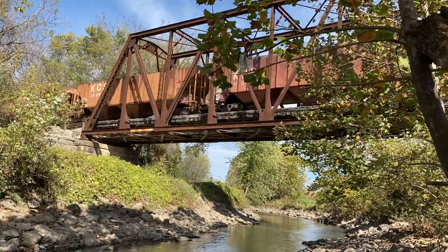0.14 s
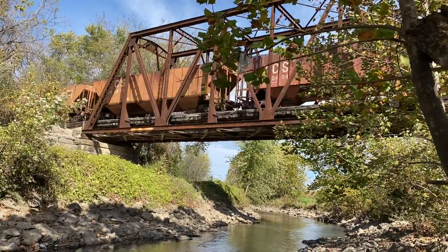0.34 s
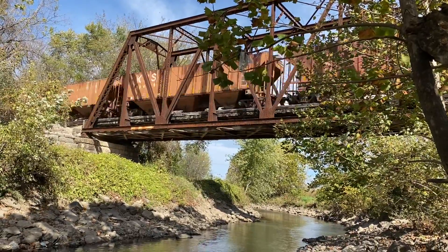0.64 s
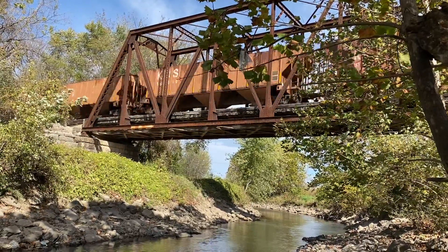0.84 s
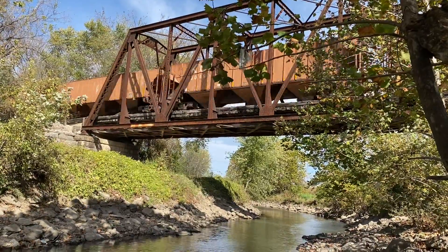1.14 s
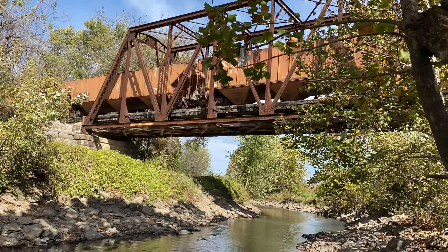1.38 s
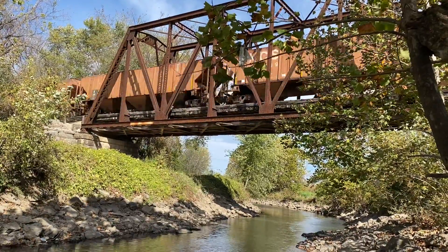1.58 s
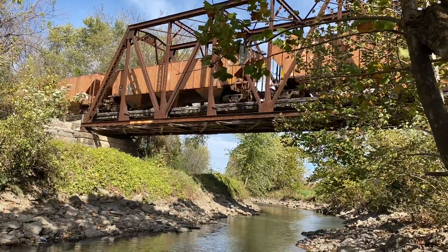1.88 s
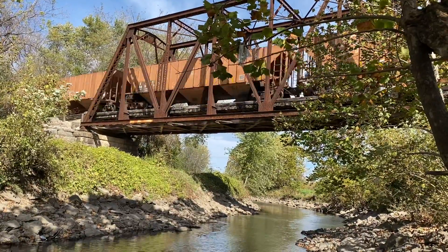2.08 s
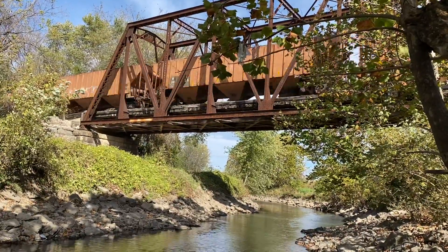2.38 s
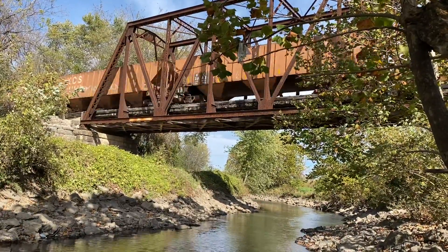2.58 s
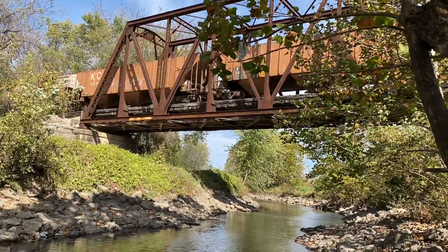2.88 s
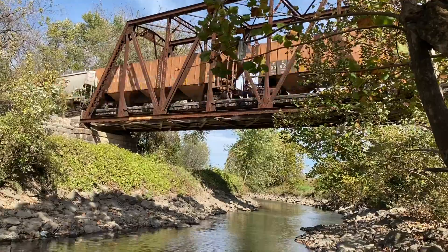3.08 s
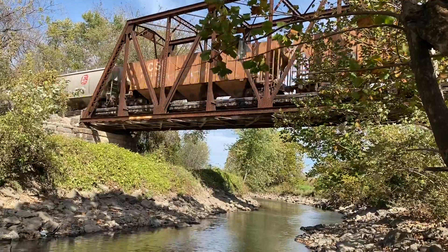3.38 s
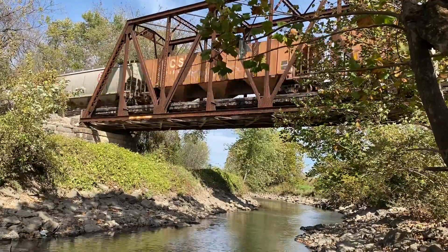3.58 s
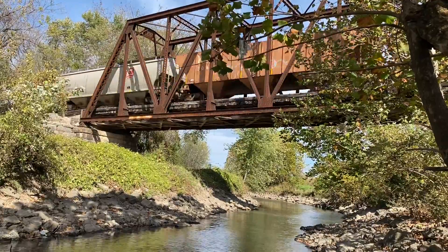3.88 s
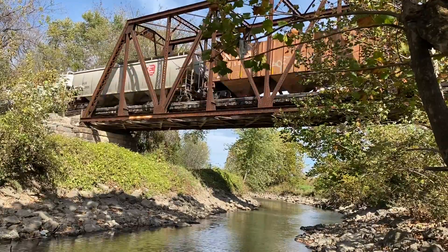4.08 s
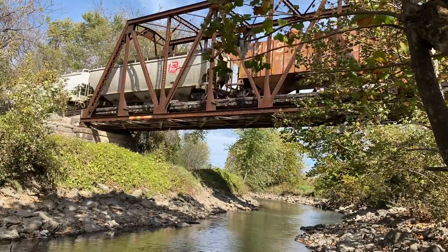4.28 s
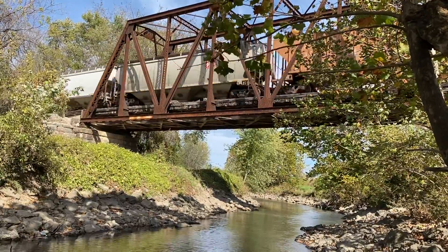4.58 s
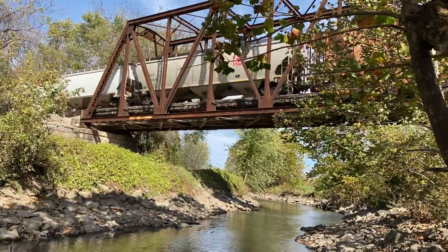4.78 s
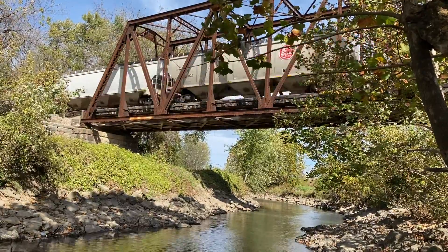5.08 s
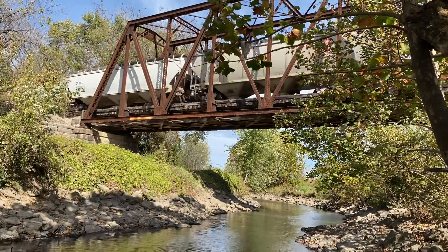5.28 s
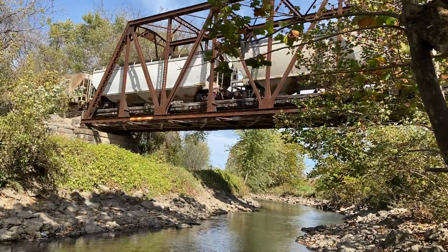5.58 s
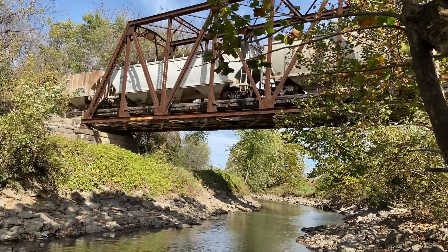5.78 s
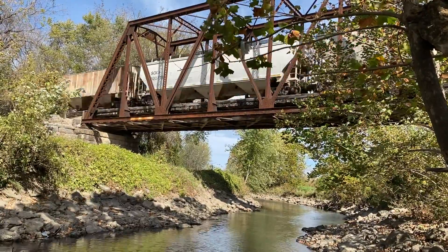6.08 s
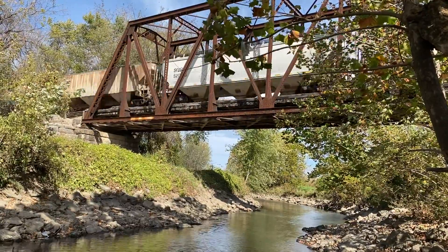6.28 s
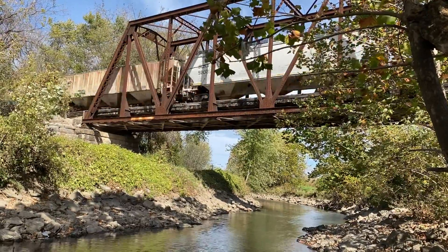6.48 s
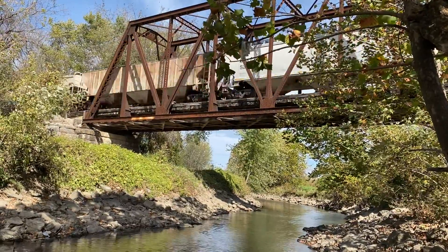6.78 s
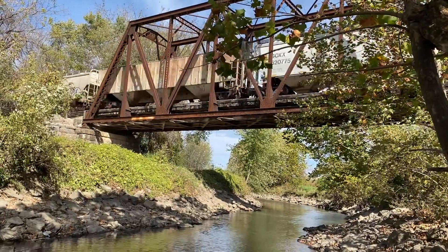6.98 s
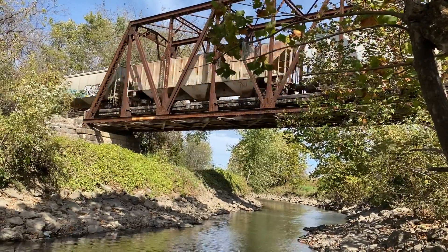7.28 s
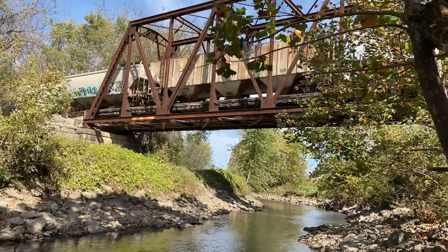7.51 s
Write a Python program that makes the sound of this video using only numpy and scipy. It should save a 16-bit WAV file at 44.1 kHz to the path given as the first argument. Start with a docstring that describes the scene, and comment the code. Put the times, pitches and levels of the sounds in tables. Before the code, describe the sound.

Outdoors on a riverbank below a steel truss bridge, freight cars are already rolling across as it starts. A low rumble and girder roar run throughout, under thin wheel singing and hiss. Flat wheels hammer four to five times a second with boomy clangs. Loose parts rattle. Later the knocks crowd together and grow harder, with short flange squeaks and grinding near the end. Fixed stereo microphone, fairly close.

```python
"""Steel truss bridge, heard from the river bank below: freight cars roll over it.
Span and deck rumble as noise shaped by low modes; wheels and rails roar, sing and hiss as shaped noise.
Flat spots on the wheels hammer the rail four to five times a second, as decaying bursts of noise.
Hard knocks crack and thud through the car bodies, as noise bursts and chords of modes; loose gear rattles
and clinks. A dry flange squeaks as short gliding tones, and its grinding taps come up near the end."""
import sys
import numpy as np
from scipy import signal
from scipy.fft import rfft, irfft
from scipy.io import wavfile
from scipy.ndimage import uniform_filter1d, map_coordinates

SR = 44100
rng = np.random.default_rng(int(sys.argv[2]) if len(sys.argv) > 2 else 0)


def wav_record(signal):
    """Record a signal, one row per channel, as 16-bit PCM in the file named by sys.argv[1]."""
    frames = np.transpose(np.atleast_2d(signal))
    bounded = np.clip(frames, -1, 1)
    # unit amplitude maps onto the largest positive 16-bit level
    quanta = np.round(bounded * 32767).astype(np.int16)
    wavfile.write(sys.argv[1], SR, quanta)


N = 337365
TIME, HZ = np.arange(N) / SR, np.fft.rfftfreq(N, 1 / SR)


def gain_of(db):
    """Decibels to amplitude."""
    return 10 ** (np.asarray(db) / 20)


def evened(x):
    """Scales to an rms of one."""
    return x / np.sqrt(np.mean(x ** 2) + 1e-20)


def matched(pair):
    """Scales a stereo pair so that its mid channel has an rms of one."""
    return pair / np.std(pair.mean(0))


def read(points):
    """A table over frequency, joined on a log axis."""
    hz, value = np.transpose(points)
    return np.interp(np.log(HZ + 1), np.log(hz + 1), value)


def follow(rows, axis=1):
    """One dB column of a curve as a gain over time."""
    rows = np.asarray(rows)
    return gain_of(np.interp(TIME, rows[:, 0], rows[:, axis]))


def drift(rate_hz):
    """Random drift of rms one, up to about rate_hz changes a second."""
    noise = rfft(rng.standard_normal(N))
    return evened(irfft(noise / (1 + (HZ / rate_hz) ** 4), N))


def decay(t, t60_s):
    """Exponential decay, down 60 dB after t60_s."""
    return np.exp(-np.log(1000) * t / t60_s)


# Resonances of the steel, shared by rolling and blows.
# Each row: frequency in Hz, width at half lift in Hz, lift in dB.
RESONANCES = [(57.5, 12, 1), (71.4, 8, -1.5), (103.2, 11, -5), (271, 29, 1), (356.4, 31, 2), (437, 22, 1),
              (568, 20, 0.5), (1620, 53, 5), (1860, 200, 3.5), (1910, 100, 1), (2240, 93, 4),
              (2550, 270, 2), (3303, 250, 6.5), (4030, 250, 4), (4590, 260, 4), (5010, 380, 4.5),
              (6620, 400, 3)]
# Likeness of left and right. Each row: frequency in Hz, coherence 0-1.
COHERENCE = [(60, .985), (140, .97), (260, .96), (420, .9), (620, .75), (1000, .66), (1350, .38),
             (2000, .42), (2700, .7), (4400, .62), (5500, .3), (6600, .85), (15000, .8)]
# Phase between left and right. Each row: frequency in Hz, lead of left in radians.
LEFT_LEAD_RAD = [(600, 0), (1100, .35), (1400, .9), (2500, .6), (4500, .3), (6000, 0), (7400, 0),
                 (8900, -np.pi), (11000, -2 * np.pi), (13100, -3 * np.pi), (15000, -4 * np.pi)]
# Balance of left and right. Each row: frequency in Hz, left minus right in dB.
LEFT_TILT_DB = [(100, -0.8), (330, -0.5), (600, 1), (1100, 0), (1700, -2), (2400, 4.5), (3500, 2),
                (5000, 1.8), (6000, 0)]


def steel(spectrum):
    """Random force rings the steel and reaches left and right partly alike; mid rms one."""
    a, b = rfft(rng.standard_normal((2, N)))
    same = np.clip(read(COHERENCE), 0, 1)
    right = same * a + np.sqrt(1 - same ** 2) * b
    right = right * np.exp(-1j * read(LEFT_LEAD_RAD))
    side = gain_of(read(LEFT_TILT_DB) / 2)
    lift_db = sum(db / (1 + (2 * (HZ - hz) / width_hz) ** 2) for hz, width_hz, db in RESONANCES)
    # 12 dB per octave beyond both ends of the spectrum
    low_hz, high_hz = spectrum[0][0], spectrum[-1][0]
    skirts = (np.minimum(HZ / low_hz, 1) / np.maximum(HZ / high_hz, 1)) ** 2
    colour = gain_of(read(spectrum) + lift_db) * skirts
    return matched(irfft(np.array([a * side, right / side]) * colour, N))


def steady(pair, amount, size):
    """Evens out a vibration's swing, its envelope averaged in power over size samples."""
    power = abs(signal.hilbert(pair.mean(0))) ** 2
    swing = np.sqrt(uniform_filter1d(power, size))
    return matched(pair / swing ** amount)


# Spectrum of the heaving span. Each row: frequency in Hz, density before resonances in dB per Hz.
SPAN_SPECTRUM = [(12, -40), (22, -23), (32, -10), (44, -1.5), (56, 0.5), (62, 5), (72, -10.5)]
# Spectrum of the drumming deck. Each row: frequency in Hz, density before resonances in dB per Hz.
DECK_SPECTRUM = [(50, -11), (62, -6.5), (72, 0), (86, -4), (103, 1), (120, -6.5), (135, -20.5), (160, -45)]
# Weight of the passing axles on span and deck. Each row: time in seconds, level before trim in dB.
AXLE_LOAD = [(0.0, -20.5), (0.2, -19), (1.09, -19.5), (1.29, -22), (1.39, -17), (2.29, -19), (2.58, -18.5),
             (3.1, -18.5), (3.28, -21), (3.38, -18.5), (4.1, -17.2), (4.47, -18.5), (4.59, -22), (4.7, -16),
             (4.97, -17.2), (5.46, -15.5), (5.66, -17.5), (6.56, -16.5), (6.76, -19), (7.15, -17),
             (7.65, -17.5)]
# Depth of the rumble. Each row: time in seconds, span against deck before trim in dB.
SPAN_OVER_DECK = [(0, 0.5), (1.2, 2.5), (2.5, 3), (4.3, -1.5), (5.2, 0), (6.8, -0.5), (7.65, 2)]


def deck(span_db=-4.0, deck_db=-0.57, steadiness=0.44):
    """The heavy span heaves and the deck drums on their low modes, with a fairly even swing."""
    heave = gain_of(span_db) * steady(steel(SPAN_SPECTRUM), steadiness, size=3000)
    drum = gain_of(deck_db) * steady(steel(DECK_SPECTRUM), steadiness, size=2200)
    share = np.sqrt(follow(SPAN_OVER_DECK))
    return follow(AXLE_LOAD) * (heave * share + drum / share)


# Heavy axles swinging one deck mode.
# Each row: middle in seconds, time from middle to 1/e in seconds, pitch in Hz, rms level at the peak in dB.
DECK_THROBS = [(-0.001, 0.031, 58, -9), (.94, .03, 58, -14), (1.135, 0.025, 57, -15),
               (1.637, 0.024, 56, -15), (1.79, .025, 67, -18), (2.029, 0.03, 49.9, -18),
               (2.433, 0.019, 80, -15), (2.617, 0.048, 54.9, -13), (2.86, 0.025, 70, -17),
               (3.457, .025, 50, -18), (3.798, 0.096, 85, -20), (4.357, .06, 71, -18.5),
               (4.453, 0.014, 70, -12), (4.942, 0.059, 78.2, -18), (5.033, .06, 58, -13.5),
               (5.199, .022, 96, -12), (5.28, 0.08, 100, -17), (5.36, 0.051, 74.1, -18),
               (5.505, 0.053, 49.7, -14), (5.941, 0.016, 58.6, -13), (6.07, 0.028, 61, -12.5),
               (6.625, 0.034, 107, -14), (6.802, 0.029, 61.2, -16), (7.01, .025, 62, -15),
               (7.152, 0.045, 60, -12), (7.58, 0.02, 106, -13)]


def throbs():
    """A heavy axle swings one low mode of the deck up and lets it fade."""
    out = np.zeros(N)
    for s, length_s, hz, db in DECK_THROBS:
        swell = gain_of(db) * np.sqrt(2) * np.exp(-((TIME - s) / length_s) ** 2)
        out += swell * np.sin(2 * np.pi * (hz * TIME + rng.random()))
    return out


def passing(pair, depth_db, order, size):
    """Sound of the moving wheels meets its reflections: patches order bins by size frames flare and fade at
    random."""
    z = signal.stft(pair, nperseg=2048, noverlap=1536)[2]
    patch = np.outer(np.hanning(order), np.hanning(size))[None]
    field = evened(signal.fftconvolve(rng.standard_normal((3, *z.shape[1:])), patch, "same"))
    # half own to each channel, half common
    flare = (field[:2] + field[2]) / np.sqrt(2)
    pair = signal.istft(z * gain_of(depth_db * flare), nperseg=2048, noverlap=1536)[1]
    return matched(pair[:, :N])


def wandering(pair, share, rate_hz):
    """No two wheels are tuned alike: resonances slide by share (rms) of their pitch."""
    place = np.arange(N) + np.cumsum(share * drift(rate_hz))
    return np.array([map_coordinates(channel, [place], order=3, mode="mirror") for channel in pair])


# Rolling contact. Each row: time in seconds, roar of the girders in dB, singing of the wheels in dB,
# hiss of the treads in dB (hiss before trim).
ROLLING_LEVELS = [(0, -23, -36, -40), (.2, -22.5, -37.5, -41), (.5, -22, -37, -40.5), (1.4, -22, -37, -41),
                  (2.5, -20.5, -37, -39), (2.8, -22, -37.5, -41), (3.4, -22.5, -37, -40.5),
                  (4.3, -23.5, -36, -40.5), (5, -21.5, -35, -39.5), (5.7, -20, -35, -39.3),
                  (6.6, -19.5, -34.5, -39), (7.65, -17.5, -35, -37.5)]
# Flanges scraping along the rail.
# Each row: middle in seconds, time from middle to 1/e in seconds, peak level before trim in dB.
FLANGE_SCRAPES = [(4.64, 0.13, -42), (4.946, 0.074, -41), (6.186, 0.21, -43)]
# Spectrum of the girders. Each row: frequency in Hz, density before resonances in dB per Hz.
GIRDER_SPECTRUM = [(90, -16), (138, 1), (175, -4), (215, -3.5), (285, -1.5), (360, -2), (480, -3.5),
                   (600, -5), (780, -13.5), (970, -10.5), (1150, -21), (1350, -31), (2000, -70)]
# Spectrum of the wheels. Each row: frequency in Hz, density before resonances in dB per Hz.
WHEEL_SPECTRUM = [(800, -39), (1150, 8.5), (1350, 0), (1900, 0), (2100, -2), (2700, -3), (3100, -16.5),
                  (4000, -47)]
# Spectrum of treads and bright gear. Each row: frequency in Hz, density before resonances in dB per Hz.
HISS_SPECTRUM = [(2000, -29), (2700, -3.5), (3200, -3), (4000, -3), (5000, -9), (5500, -8.5), (6700, -14.5),
                 (7800, -14), (8800, -33), (11200, -21), (14500, -33.5), (16000, -46)]


def rolling(hiss_db=-0.75, roar_flutter_db=-0.62, sing_flutter_db=0.1, hiss_flutter_db=0.58):
    """Rough treads make girders roar, wheels sing and a hiss that swells when a flange scrapes."""
    rough = drift(23)  # common flutter: the roar eases as the hiss flares
    scraping = sum(gain_of(db) * np.exp(-((TIME - s) / length_s) ** 2)
                   for s, length_s, db in FLANGE_SCRAPES)
    roar = passing(steel(GIRDER_SPECTRUM), depth_db=1.43, order=5, size=16)
    roar = roar * follow(ROLLING_LEVELS, axis=1)
    sing = passing(steel(WHEEL_SPECTRUM), depth_db=2.0, order=5, size=7)
    sing = sing * follow(ROLLING_LEVELS, axis=2)
    hiss = wandering(steel(HISS_SPECTRUM), share=.012, rate_hz=3)
    hiss = passing(hiss, depth_db=2.5, order=8, size=20)
    hiss = hiss * np.hypot(follow(ROLLING_LEVELS, axis=3), scraping)
    return (roar * gain_of(roar_flutter_db * rough)
            + sing * gain_of(sing_flutter_db * rough)
            + hiss * gain_of(hiss_db + hiss_flutter_db * rough))


def loose_parts(low_hz, high_hz, per_s, t60_s, spread_db, phase_rad, count):
    """Many small pieces of steel, tapped at random, each with its own pitch and place; mid rms one."""
    out, t = np.zeros((2, N)), np.arange(SR // 6) / SR
    for hz in np.geomspace(low_hz, high_hz, count) * rng.uniform(.98, 1.02, count):
        struck = rng.random(N) < per_s / count / SR
        taps = struck * gain_of(spread_db * np.minimum(rng.exponential(1, N), 2))
        phase = phase_rad * rng.standard_normal((2, 1))
        envelope = (1 - np.exp(-t * hz)) ** 2 * decay(t, t60_s)
        ring = low_hz / hz * envelope * np.sin(2 * np.pi * hz * t + phase)
        out += signal.oaconvolve(taps[None], ring, axes=1)[:, :N]
    return matched(out)


# Hatches, chains and brake rods shaken by the ride.
# Each row: time in seconds, rattle of plates in dB, chatter of small parts in dB.
RATTLE_LEVELS = [(0, -44, -50), (.35, -34.5, -39.5), (2, -33.5, -39), (2.8, -33.5, -39), (3.4, -34, -41.5),
                 (4.5, -34.5, -43), (4.9, -34.5, -40), (5.5, -33, -38), (5.8, -30, -41),
                 (6.6, -31.5, -39.5), (7.65, -31.5, -37.5)]


def rattle():
    """Loose plates rattle in the middle range and small parts chatter above them."""
    plates = loose_parts(low_hz=659.4, high_hz=1128, per_s=170, t60_s=0.071, spread_db=3.0,
                         phase_rad=0.98, count=16)
    small = loose_parts(low_hz=1343.5, high_hz=3001, per_s=260, t60_s=0.11, spread_db=3.5,
                        phase_rad=1.0, count=32)
    return plates * follow(RATTLE_LEVELS, axis=1) + small * follow(RATTLE_LEVELS, axis=2)


# Direct sound and reflections from truss and river.
# Each row: delay in seconds, strength before scaling to unit total power in dB.
REFLECTIONS = [(0, -2.5), (.012, -4), (.027, -9.5), (.058, -12)]


def strikes(times_s, levels_db, t60_s, rise_s):
    """Envelope of blows: each rises fast, dies away and returns in reflections, summed in power."""
    hits, t = np.zeros(N + SR), np.arange(SR // 2) / SR
    total = sum(gain_of(db) ** 2 for _, db in REFLECTIONS)
    for delay_s, db in REFLECTIONS:
        at = (abs(np.atleast_1d(times_s) + delay_s) * SR).astype(int)
        np.add.at(hits, at, gain_of(np.atleast_1d(levels_db) + db) ** 2 / total)
    ring = (1 - np.exp(-t / rise_s)) * decay(t, t60_s)
    return np.sqrt(abs(signal.fftconvolve(hits, ring ** 2)[:N]))


# Wheels with a flat spot, one blow a turn.
# Each row: first blow in seconds, end in seconds, one turn in seconds, nearest point in seconds,
# then levels at the nearest point before trim: boom of the car body in dB, clang of the girders in dB,
# ring of the wheel in dB.
FLAT_SPOT_WHEELS = [(0.06, .95, .2015, 0.75, -28, -24.5, -34), (1.085, 2.2, 0.22, 1.8, -23, -25, -35),
                    (2.547, 4.1, 0.23, 2.5, -17.5, -24.5, -32), (4.525, 6.7, .21, 7.5, -19.5, -23, -34),
                    (5.662, 7.65, .2095, 6.3, -21, -23.5, -30.5), (6.865, 7.6, 0.21, 7.3, -27, -20.5, -32)]
PASS_S = 0.78  # a wheel is 3 dB fainter this long before and after its nearest point


def flat_spots():
    """One blow for every turn of a flat wheel, fading with distance: rows of (s, boom, clang, ring dB)."""
    rows = []
    for first_s, end_s, turn_s, nearest_s, *levels_db in FLAT_SPOT_WHEELS:
        for s in np.arange(first_s, end_s, turn_s):
            far_db = 10 * np.log10(1 + ((s - nearest_s) / PASS_S) ** 2)
            rows.append([s, *(np.array(levels_db) - far_db)])
    return rows


# Cars with flat wheels. Each row: start in seconds, end in seconds, factor on the boom spectrum's pitch.
FLAT_WHEEL_CARS = [(0, 4.4, .87), (4.4, 8, 1.17)]
# Boom of a car body.
# Each row: frequency before the car's factor in Hz, density before resonances in dB per Hz.
BOOM_SPECTRUM = [(90, -6), (180, -11), (280, -0.5), (370, 2.5), (460, -2), (600, -21), (1000, -57)]
# Clang of struck girders. Each row: frequency in Hz, density before resonances in dB per Hz.
CLANG_SPECTRUM = [(300, -20), (450, -1.5), (560, 2.5), (780, -5.5), (980, -5), (1200, -16), (1500, -21),
                  (2500, -49)]


def blows(boom_db=3, clang_db=4, ring_db=1.0, spit_db=-9, steadiness=0.27):
    """Flat spots slap the rail: the car booms, the girders clang, the wheel rings and spits."""
    s, boom, clang, ring = np.transpose(flat_spots())
    girders = steady(steel(CLANG_SPECTRUM), steadiness, size=500)
    out = girders * strikes(s, clang + clang_db, t60_s=0.19, rise_s=0.0022)
    for start_s, end_s, pitch in FLAT_WHEEL_CARS:
        own = (start_s <= s) & (s < end_s)
        body = steel([(hz * pitch, db) for hz, db in BOOM_SPECTRUM])
        body = steady(body, steadiness, size=800)
        out += body * strikes(s[own], boom[own] + boom_db, t60_s=0.27, rise_s=0.0011)
    out += steel(WHEEL_SPECTRUM) * strikes(s, ring + ring_db, t60_s=0.097, rise_s=0.0022)
    return out + steel(HISS_SPECTRUM) * strikes(s, ring + spit_db, t60_s=0.14, rise_s=.001)


def chord(modes, t, detune, apart_rad):
    """Modes (Hz, dB) retuned a little at every blow, left and right out of step; rms one."""
    hz, db = np.transpose(modes)
    hz = hz * (1 + detune * rng.uniform(-0.85, 1, len(hz)))
    turn = 2 * np.pi * (np.outer(hz, t) + rng.random((len(hz), 1)))
    apart = apart_rad * rng.choice([-1, 1], (len(hz), 1))
    return evened(gain_of(db) @ np.sin([turn + apart, turn - apart]))


# Single hard knocks, many on a flat wheel's blows.
# Each row: start in seconds, nominal pitch of the body's thud in Hz, thud before trim in dB,
# nominal pitch of the girder's clang in Hz, clang in dB, crack before trim in dB.
HARD_KNOCKS = [(.071, 443, -23, 680, -25, -27), (.269, 302, -19.5, 1090, -29, -26),
               (.277, 391, -26, 807, -22, -24), (0.471, 400, -25, 770, -23, -40),
               (0.563, 346, -15, 700, -38, -42), (.664, 297, -17, 690, -25, -43),
               (.691, 330, -31, 709, -21.5, -40), (0.881, 396, -20, 656, -19.5, -44),
               (1.099, 393, -36, 655, -20, -31), (1.284, 366, -19, 775, -24, -42),
               (1.495, 378, -14.5, 706, -24, -42), (1.521, 436, -17, 656, -25, -34),
               (1.714, 377, -14.5, 700, -34, -40), (1.727, 345, -26, 678, -23, -31),
               (1.923, 351, -22, 696, -21, -33), (1.969, 354, -18, 700, -34, -42),
               (2.126, 302, -14, 695, -32, -42), (2.487, 400, -30, 727, -21.5, -42),
               (2.54, 286, -22, 844, -21.5, -40), (2.753, 360, -13, 700, -28, -42),
               (2.781, 305, -17, 685, -28, -30), (2.97, 359, -13, 720, -24, -27),
               (3.172, 323, -16, 705, -31, -44), (3.207, 529, -22, 710, -35, -38),
               (3.387, 331, -15.5, 850, -30, -27.5), (3.615, 287, -17, 700, -29, -32),
               (3.634, 381, -15, 700, -28, -30), (3.818, 331, -21, 655, -23, -34),
               (4.312, 363, -17.5, 700, -43, -48), (5.157, 398, -19, 664, -17.5, -31),
               (5.382, 355, -13.5, 704, -34, -42), (5.598, 350, -12, 930, -32, -42),
               (5.653, 409, -14, 660, -24, -40), (5.685, 360, -14, 713, -21, -33),
               (5.768, 373, -12, 650, -26, -38), (5.795, 343, -16, 920, -18.5, -36),
               (5.899, 381, -13, 696, -31, -42), (5.959, 392, -18, 997, -18.5, -33),
               (5.986, 420, -16, 650, -25, -40), (6.12, 403, -29, 706, -20, -40),
               (6.174, 405, -22, 804, -20, -34), (6.305, 459, -17, 1018, -25, -37),
               (6.376, 350, -12.5, 841, -21, -24), (6.405, 303, -17.5, 696, -30, -34),
               (6.452, 397, -20, 683, -22.5, -38), (6.497, 431, -12.5, 676, -30, -40),
               (6.585, 362, -16, 700, -30, -42), (6.61, 400, -28, 677, -20, -38),
               (6.654, 340, -18, 704, -30, -38), (6.724, 357, -12.5, 870, -22, -38),
               (6.877, 406, -31, 900, -20, -28), (6.919, 387, -7.5, 700, -32, -30),
               (6.947, 438, -14, 734, -24, -25), (7.049, 341, -13.5, 710, -28, -40),
               (7.074, 449, -17, 920, -21, -33), (7.131, 388, -11.5, 755, -17, -28),
               (7.16, 349, -21, 740, -16.5, -30), (7.251, 504, -13.5, 710, -33, -40),
               (7.357, 376, -17, 968, -19.5, -26), (7.42, 316, -14.5, 696, -32, -42),
               (7.487, 433, -17, 970, -18.5, -28), (7.558, 306, -14.5, 672, -17.5, -24)]
# Modes of a car body. Each row: ratio to its thud pitch before detuning, relative level in dB.
BODY_MODES = [(.7, -9.5), (.85, -5), (0.998, 3.5), (1.14, -7), (1.33, -4), (1.6, -9.5)]
# Modes of a struck girder. Each row: ratio to its clang pitch before detuning, relative level in dB.
GIRDER_CHORD = [(.72, -7.5), (.86, -8), (1.001, 7), (1.17, -2.5), (1.362, -5)]
# Modes of the struck rail. Each row: frequency before detuning in Hz, relative level in dB.
RAIL_MODES = [(640, 0), (860, -8), (1060, 5), (1230, 6), (1660, -6.5), (1880, -11), (3400, -14)]
# Wheel cracking against the rail. Each row: frequency in Hz, density before resonances in dB per Hz.
CRACK_SPECTRUM = [(600, -11), (850, 2), (1200, 7), (1750, 6), (2100, -3), (3400, -12.5), (5000, -22.5)]


def knocks(thud_db=-3.5, crack_db=1, rail_db=-1, girder_t60_s=0.082, rail_t60_s=.08,
           rise_s=0.0017, swell_s=0.0098, steadiness=0.33):
    """A wheel knocks hard on the rail: a ringing crack, a girder's clang and a thud of its own pitch."""
    s, _, _, _, clang, crack = np.transpose(HARD_KNOCKS)
    girders = steady(steel(CLANG_SPECTRUM), steadiness, size=400)
    out = girders * strikes(s, clang, t60_s=0.14, rise_s=0.00074)
    cracks = steady(steel(CRACK_SPECTRUM), steadiness, size=300)
    out += cracks * strikes(s, crack + crack_db, t60_s=0.081, rise_s=0.0011)
    t = np.arange(SR // 5) / SR
    swell = t / swell_s * np.exp(1 - t / swell_s)
    rise = 1 - np.exp(-t / rise_s)
    snap, ring = rise * decay(t, rail_t60_s), rise * decay(t, girder_t60_s)
    for start_s, body_hz, body_db, girder_hz, girder_db, snap_db in HARD_KNOCKS:
        body_modes = [(body_hz * ratio, db) for ratio, db in BODY_MODES]
        girder_modes = [(girder_hz * ratio, db) for ratio, db in GIRDER_CHORD]
        thud = gain_of(body_db + thud_db) * swell * chord(body_modes, t, detune=0.033, apart_rad=0.12)
        girder = gain_of(girder_db) * ring * chord(girder_modes, t, detune=0.032, apart_rad=0.35)
        rail = gain_of(snap_db + rail_db) * snap * chord(RAIL_MODES, t, detune=.05, apart_rad=.5)
        part = out[:, round(start_s * SR):][:, :len(t)]
        part += (thud + girder + rail)[:, :part.shape[1]]
    return out


# Couplers and brake gear clinking. Each row: start in seconds, level in dB, t60 in seconds.
GEAR_CLINKS = [(0.27, -37, 0.28), (0.69, -38, 0.18), (2.37, -36, 0.17), (2.78, -37, 0.19), (6.165, -38, .2),
               (7.145, -37, 0.11), (7.29, -41, .12), (7.562, -47, 0.11)]


def clinks():
    """Loose gear knocks with a short bright rattle."""
    power = sum(strikes(s, db, t60_s, rise_s=0.00045) ** 2 for s, db, t60_s in GEAR_CLINKS)
    return steel(HISS_SPECTRUM) * np.sqrt(power)


# Flange squeaks. Each row: middle in seconds, half length in seconds, pitch in Hz, glide in Hz per second,
# waver as an rms share of pitch, rms level at the peak before shiver in dB.
FLANGE_SQUEAKS = [(.713, .08, 10520, 0, .008, -54), (2.05, .1, 10450, 0, .015, -61),
                  (4.562, .2, 4590, 0, .012, -50), (6.183, .03, 3370, 0, .02, -39.5),
                  (6.204, .03, 4570, 3000, .018, -40), (6.259, .05, 10550, 0, .018, -63),
                  (6.42, .02, 1630, 0, .015, -29), (6.593, .02, 1606, 0, .005, -27),
                  (6.62, 0.03, 1620, 0, .005, -29), (6.908, 0.035, 1655, -900, .004, -26),
                  (7.014, .036, 1612, 0, .008, -31.5), (7.158, .055, 1830, -1300, .003, -30),
                  (7.377, .024, 1640, 0, .012, -29), (7.42, .024, 1606, 0, .005, -20),
                  (7.486, .03, 1740, 1500, .01, -31), (7.57, .025, 4020, 0, .02, -39)]


def squeaks(shiver_db=3.5):
    """A flange sticks and slips and sets one wheel mode singing, unsteady in pitch and strength."""
    out, wander = np.zeros((2, N)), drift(220)
    grip = evened(gain_of(shiver_db * drift(150)))
    for s, half_s, hz, glide, waver, db in FLANGE_SQUEAKS:
        near = abs(TIME - s) < half_s
        t = TIME[near] - s
        pitch_hz = hz * (1 + waver * wander[near]) + glide * t
        turn = 2 * np.pi * np.cumsum(pitch_hz) / SR
        swell = gain_of(db) * np.sqrt(2) * np.cos(np.pi / 2 * t / half_s) ** 4 * grip[near]
        lag = np.interp(hz, HZ, read(LEFT_LEAD_RAD))
        out[:, near] += swell * np.sin([turn, turn - lag])
    return out


# A dry flange grinding as its car draws near. Each row: time in seconds, level in dB.
GRINDING_LEVELS = [(5.2, -50), (5.57, -41), (5.8, -46), (6.25, -43), (6.42, -38), (6.75, -43), (6.95, -37),
                   (7.23, -41), (7.45, -33), (7.65, -32.5)]


def grinding():
    """Quick slips of the flange keep a few close wheel modes chattering, faint until near the end."""
    slips = loose_parts(low_hz=1530, high_hz=1848, per_s=420, t60_s=0.068, spread_db=1.5,
                        phase_rad=1.0, count=7)
    return slips * follow(GRINDING_LEVELS)


def scene():
    """The train on the bridge."""
    return (deck() + throbs() + rolling() + rattle() + blows()
            + knocks() + clinks() + squeaks() + grinding())


EDGE_HZ = 15700


def record(dry):
    """Soft overload on the highest peaks, soft ends, then the band limit."""
    held = dry / (1 + (dry / .95) ** 8) ** (1 / 8)
    held = held * signal.windows.tukey(N, .001)
    lowpass = signal.firwin(511, EDGE_HZ, window=("kaiser", 9), fs=SR)
    return signal.oaconvolve(held, lowpass[None], "same")


dry = scene()
out = record(dry)
wav_record(out)
```